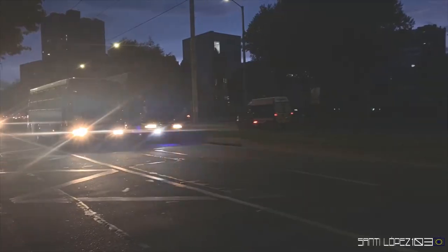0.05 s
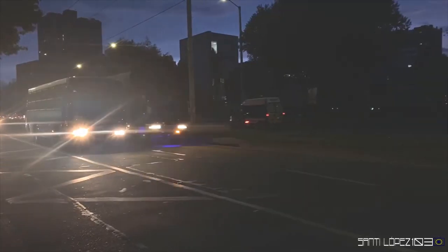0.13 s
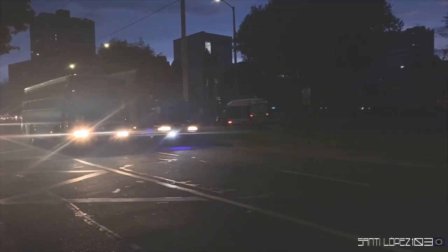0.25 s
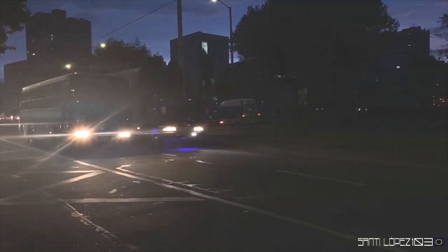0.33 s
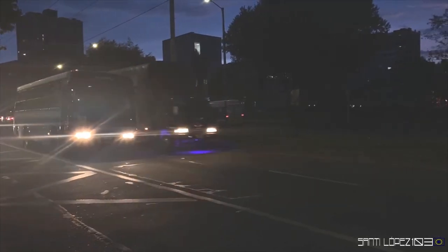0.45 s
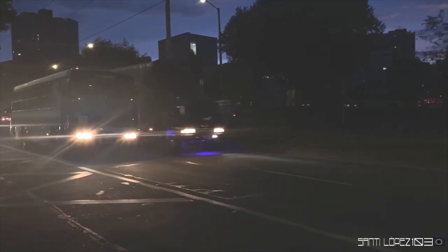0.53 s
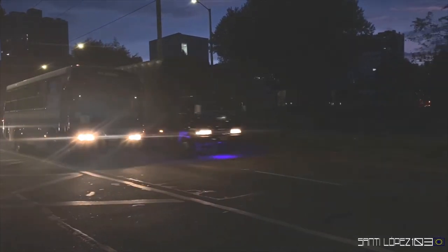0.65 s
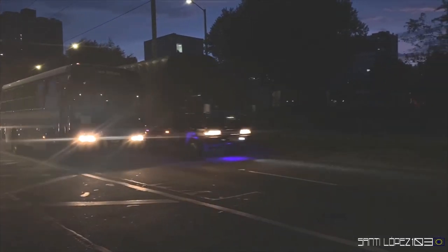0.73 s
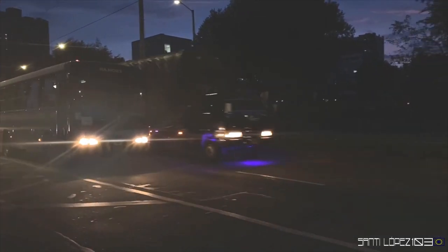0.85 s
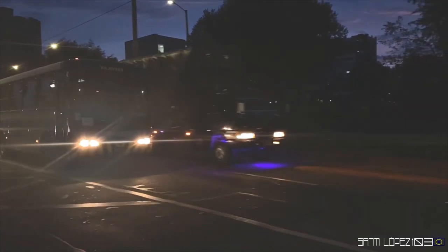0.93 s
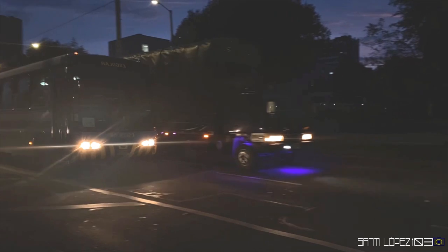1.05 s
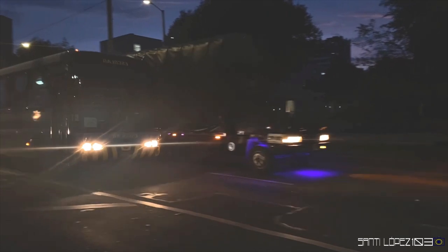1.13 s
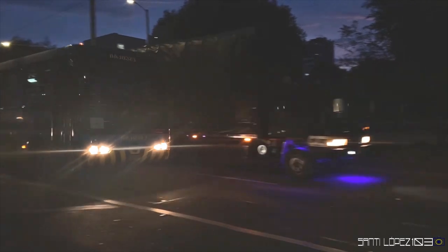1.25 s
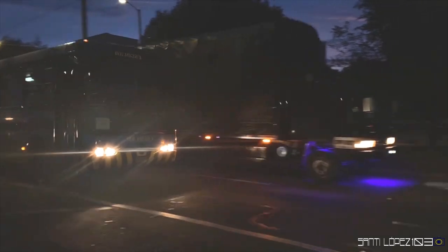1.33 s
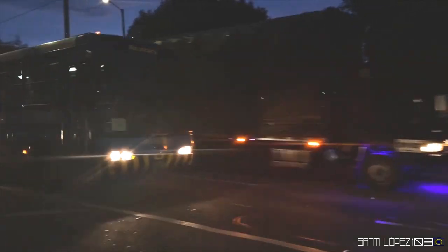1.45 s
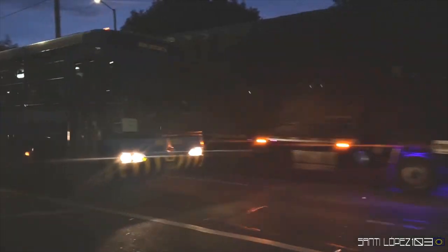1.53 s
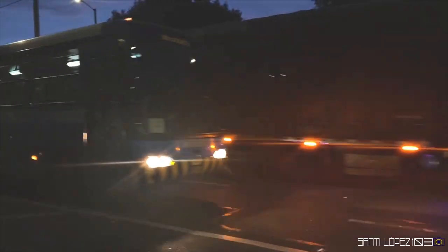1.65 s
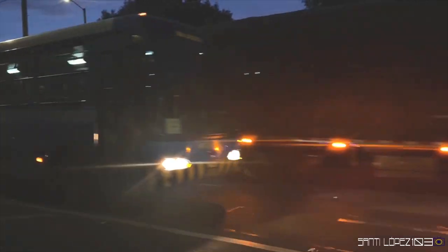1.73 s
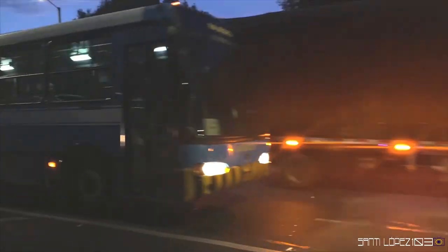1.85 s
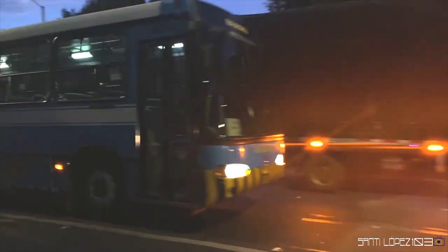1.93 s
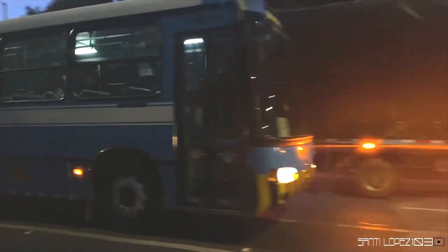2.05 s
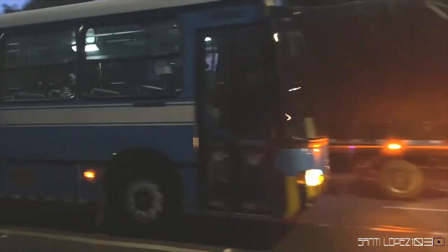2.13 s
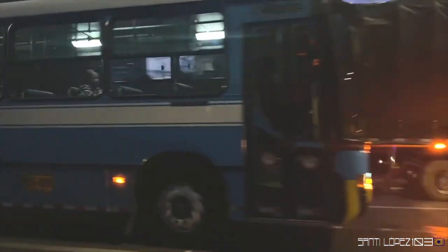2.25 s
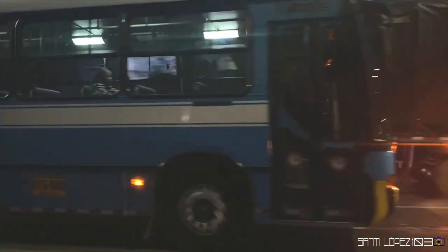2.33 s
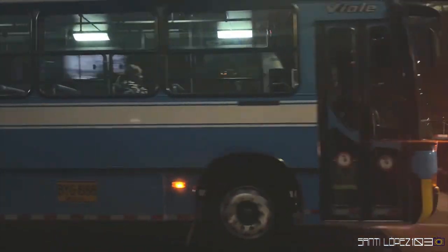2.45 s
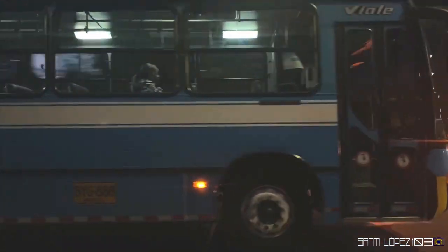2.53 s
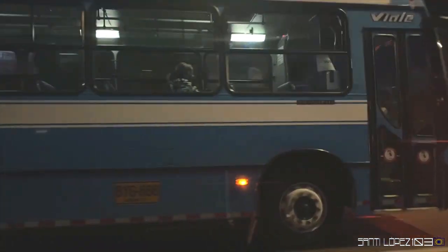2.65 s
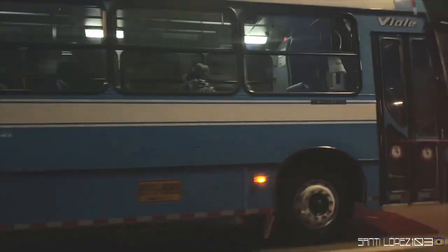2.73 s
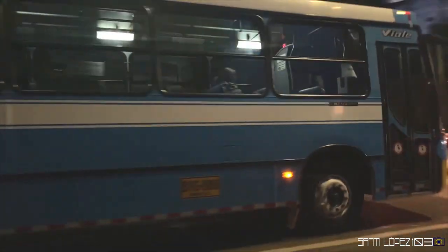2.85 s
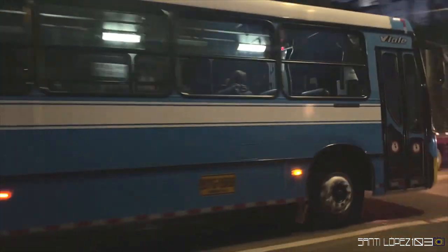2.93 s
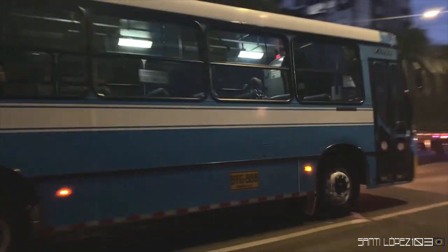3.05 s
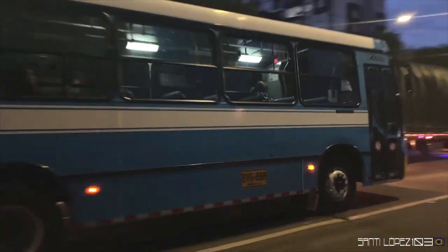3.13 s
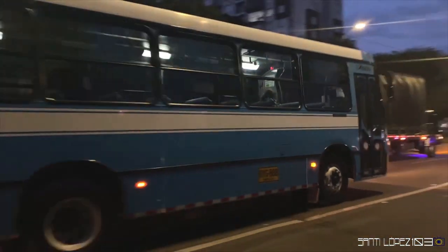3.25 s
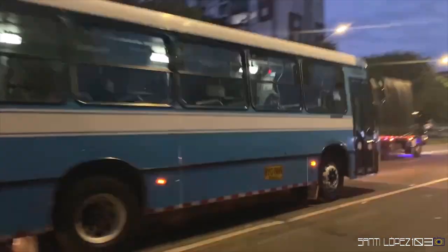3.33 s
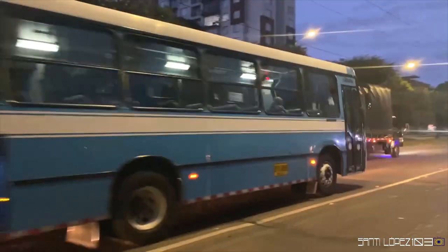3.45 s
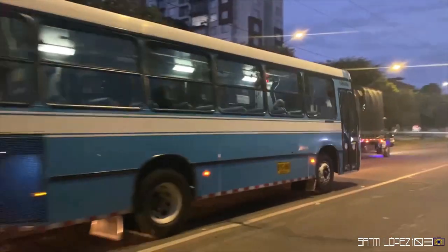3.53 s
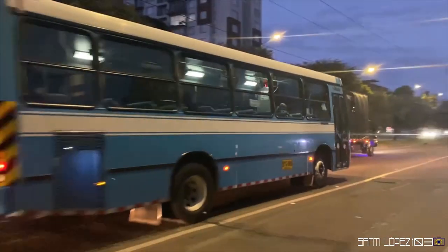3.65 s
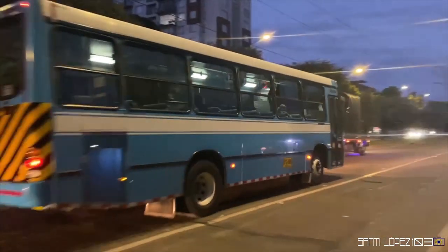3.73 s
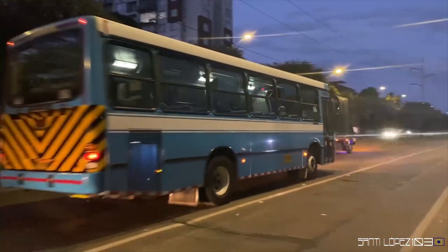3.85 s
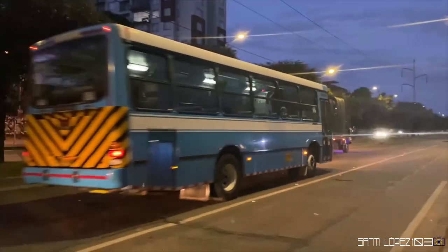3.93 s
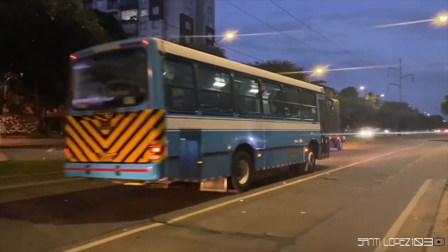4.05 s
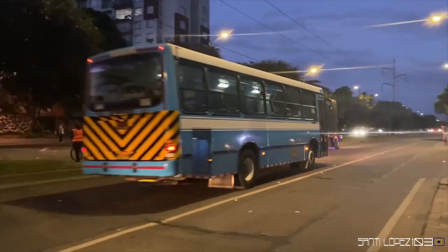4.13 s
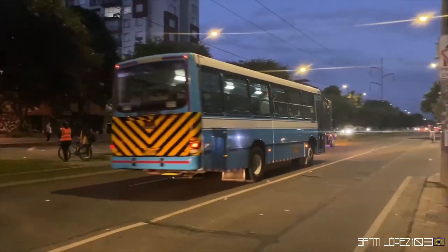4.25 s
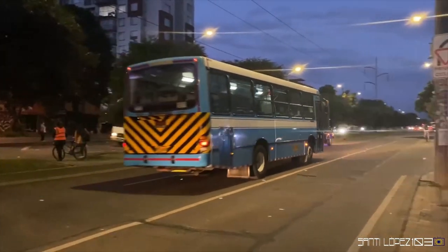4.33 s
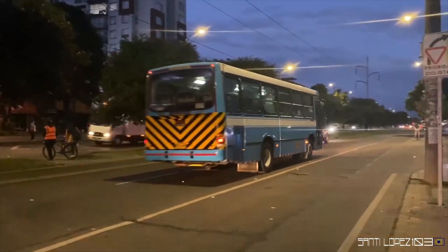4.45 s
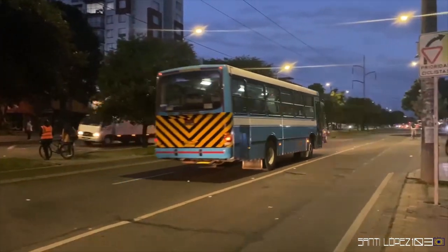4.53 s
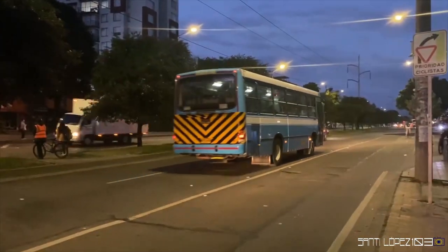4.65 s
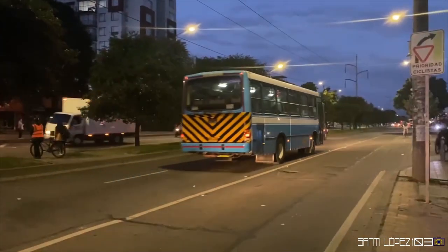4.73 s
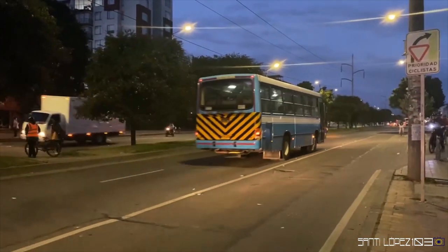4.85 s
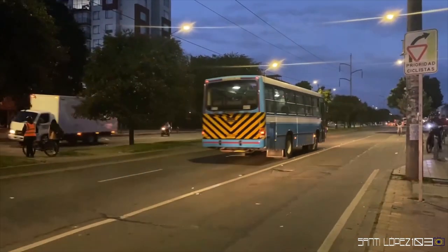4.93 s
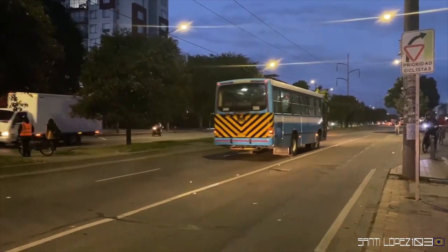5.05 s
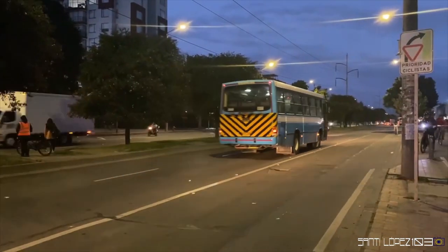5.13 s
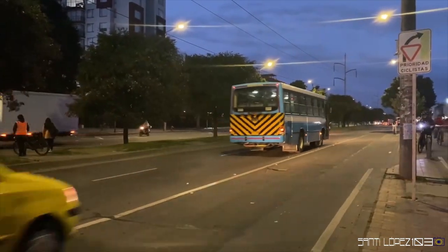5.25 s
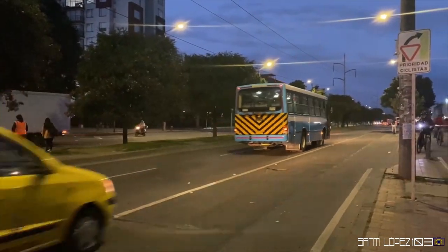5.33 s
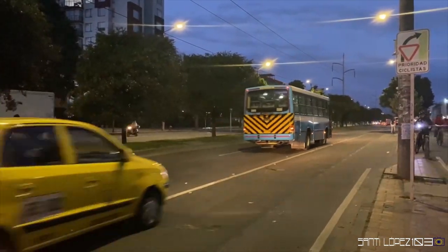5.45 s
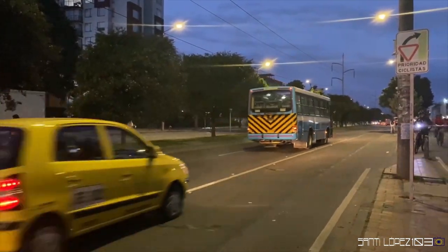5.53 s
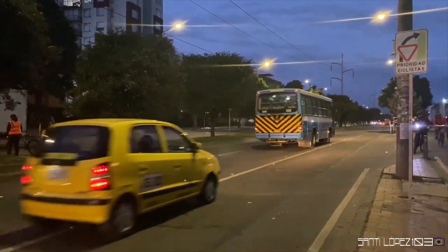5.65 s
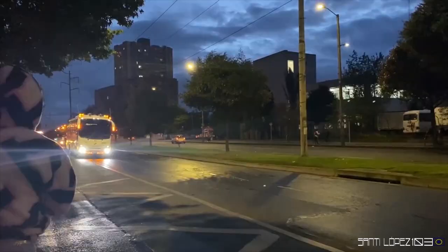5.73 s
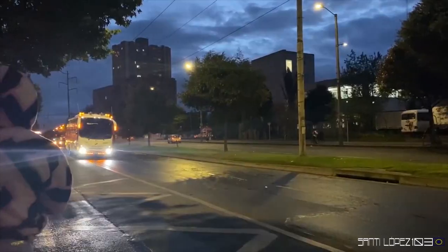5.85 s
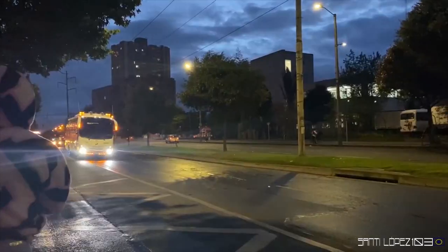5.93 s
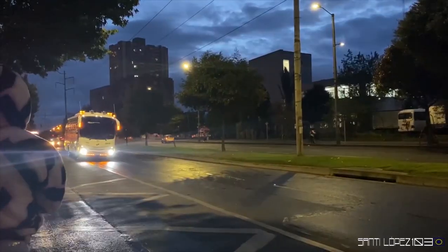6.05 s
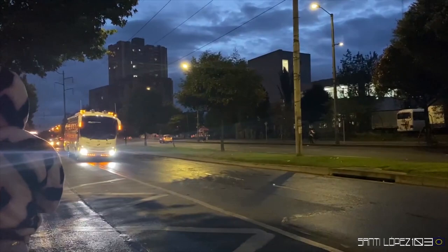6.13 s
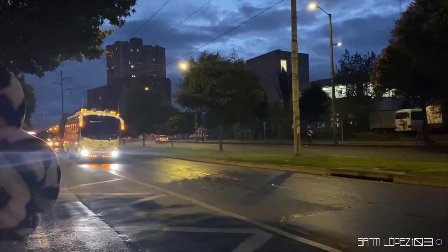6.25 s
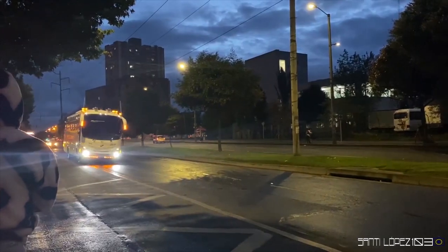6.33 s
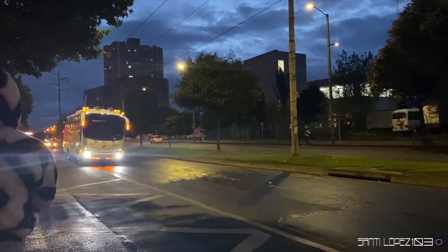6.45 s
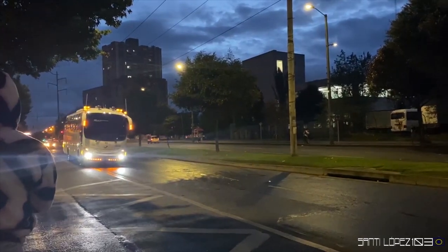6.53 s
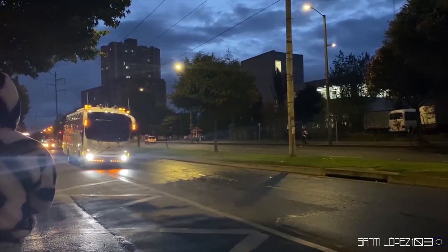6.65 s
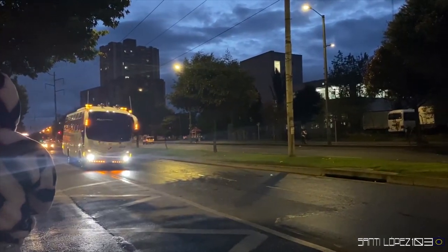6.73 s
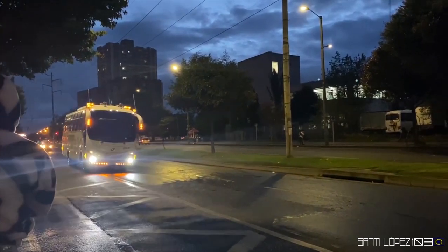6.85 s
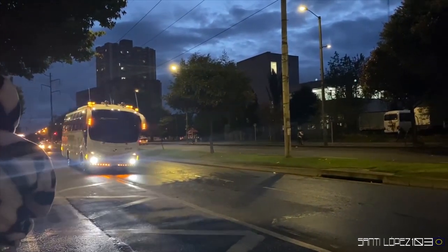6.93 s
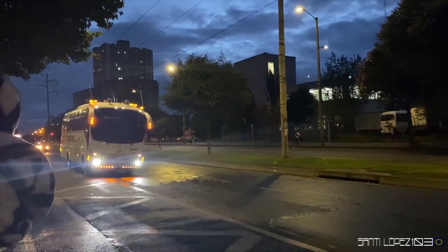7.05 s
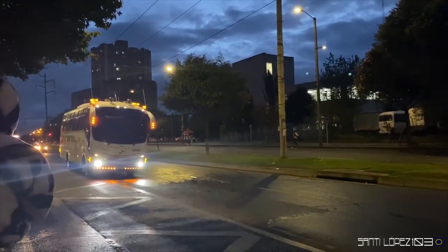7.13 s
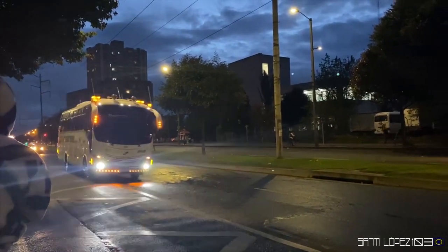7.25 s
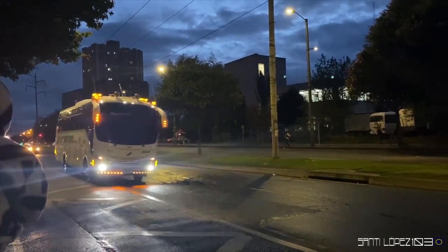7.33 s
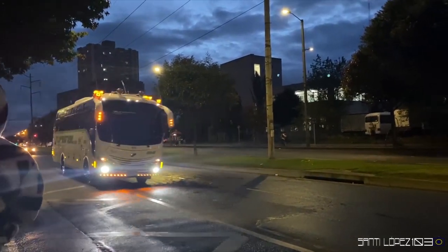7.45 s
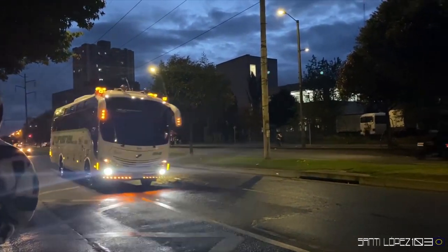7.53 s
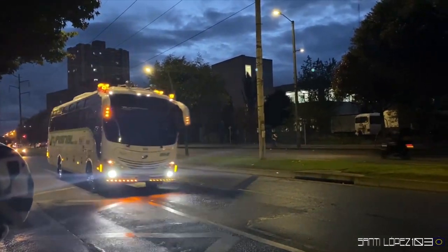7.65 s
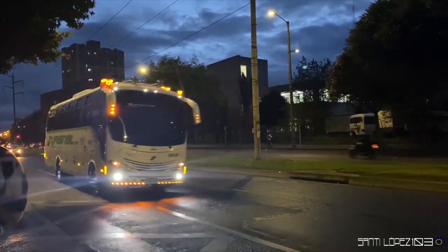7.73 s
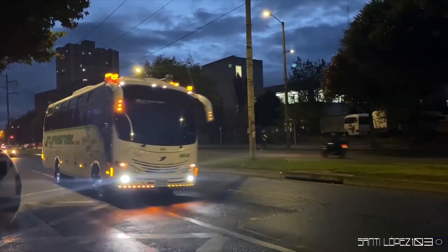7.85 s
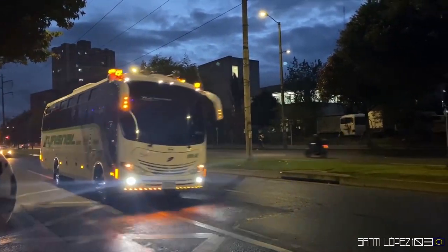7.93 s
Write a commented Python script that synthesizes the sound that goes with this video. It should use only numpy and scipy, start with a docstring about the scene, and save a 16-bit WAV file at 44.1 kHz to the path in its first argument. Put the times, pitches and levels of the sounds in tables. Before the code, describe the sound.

From the kerb of a wet city road, a diesel truck drones up and roars past with jingling loose metal and brief squeaks. A bus follows close with sharp air puffs, its engine swelling at the rear before pulling away, and a taxi rolls by. A dry click cuts to a quieter view where a coach approaches, engine pitch sinking over low booms and tyre hiss.

```python
"""Kerbside on a wet city road. A diesel truck drones by on harmonics of its firing rate, with loose metal
ringing in damped modes. A bus passes close with puffs of air, its engine drone swelling, and pulls away;
a taxi follows. Coloured noise makes their rumble, roar and wet-tyre spray.
Then a dry click and an abrupt jump to a quieter scene: a coach rolls up, a stack of firing multiples
falling in pitch as its engine slows, over low booms and tyre noise."""
import sys
import numpy as np
from scipy import signal
from scipy.fft import rfft, irfft, next_fast_len
from scipy.io import wavfile
from scipy.ndimage import map_coordinates

SR = 44100
rng = np.random.default_rng(int(sys.argv[2]) if len(sys.argv) > 2 else 0)


def persist_wave(psi):
    """Save psi, clipped to +-1, as 16-bit WAV."""
    counts = np.round(np.clip(psi, -1, 1) * 32767).astype(np.int16)
    wavfile.write(sys.argv[1], SR, np.atleast_2d(counts).T)


N = 352359

TIME = np.arange(N) / SR  # s
JUMP_S = 5.8017  # the second scene begins
SIDES = np.array([[1], [-1]])  # sign of the side signal, left and right
# spectrum of low road rumble: (frequency [Hz], relative level [dB])
RUMBLE_COLOUR = [(25, -33), (36, -13), (48, -5), (60, -5.5), (75, -6), (105, -6)]
# spectrum of fine water spray: (frequency [Hz], relative level [dB])
SPRAY_COLOUR = [(5500, 0), (7000, 0), (9200, -2.5), (11300, -6), (13200, -10.5), (15000, -11.5),
                (16500, -20)]
# edges of rumble, engine body, roar, clatter, spray and fine spray in the first scene: frequency [Hz]
PASSING_EDGES_HZ = [25, 105, 420, 1700, 5500, 9200, 16500]
# agreement of the two microphones, the usual bearing: (frequency [Hz], coherence [0-1], left lead [rad])
AHEAD = [(60, 0.86, 0), (150, 0.97, 0.0082), (400, 0.85, 0), (1050, 0.79, 0), (1730, 0.38, 0),
         (3650, 0.76, 0), (5730, 0.38, 0), (7560, 1, 0), (16000, 1, 0.038)]


def from_db(db):
    """Amplitude gain from decibels: 20 dB is a factor of ten."""
    return 10 ** (np.asarray(db) / 20)


def rms_one(x):
    """Normalisation to unit mean power."""
    return x / np.sqrt(np.mean(x ** 2) + 1e-20)


def in_time(rows):
    """Linear interpolation of each column of a curve at every sample."""
    s, *columns = np.transpose(rows)
    return [np.interp(TIME, s, c) for c in columns]


def at_hz(points, hz):
    """Interpolation of each column of a spectrum on a log-frequency axis."""
    known_hz, *columns = np.transpose(points)
    return [np.interp(np.log(hz), np.log(known_hz), c) for c in columns]


def drift(rate):
    """Random modulation of rms 1: white noise through a double-pole lowpass at this rate in Hz."""
    step = 40  # samples between computed values
    r = np.exp(-2 * np.pi * rate * step / SR)
    white = rng.standard_normal(N // step + 2002)
    slow = signal.lfilter([1], [1, -2 * r, r * r], white)[2000:]  # drops the filter's start
    return np.interp(np.arange(N) / step, np.arange(len(slow)), rms_one(slow))


def turning(hz):
    """Phase in radians as the time integral of frequency."""
    return 2 * np.pi * np.cumsum(hz) / SR


def swell(at_s, span_s, falloff=1.515):
    """Spreading loss along a straight pass: gain 1 when nearest, falling as a power of distance."""
    return (1 + ((TIME - at_s) / span_s) ** 2) ** (-falloff / 2)


def noise(colour, low, high, bearing=AHEAD):
    """Spectrally shaped stereo noise of rms 1; interaural-style coherence and phase set its bearing."""
    padded = next_fast_len(N, True)
    hz = np.fft.rfftfreq(padded, 1 / SR) + 1  # offset avoids log of zero
    edges = np.sqrt((1 + (low / hz) ** 24) * (1 + (hz / high) ** 24))
    gain = from_db(at_hz(colour, hz)[0]) / edges
    alike, lead = at_hz(bearing, hz)
    alike = np.clip(alike, 0, 1)
    mid, side = rfft(rng.standard_normal((2, padded)))
    pair = gain * (np.sqrt(1 + alike) * mid + SIDES * np.sqrt(1 - alike) * side)
    pair[0] *= np.exp(1j * lead)
    return rms_one(irfft(pair, padded)[:, :N])


def road_echo(x, size=1024, width_octaves=0.26):
    """Destructive interference: the road's reflection weakens one moving band of the noise."""
    # (time [s], centre [Hz], gain at the centre [dB])
    hollow = [(1.4, 1600, 0), (1.9, 1640, -4), (3.1, 1680, 0), (3.6, 2000, -3), (4.0, 2350, -1.5),
              (4.6, 2450, -4), (6.5, 2500, -0.5), (7.3, 2440, -7.5), (7.95, 2370, -4)]
    hz, s, frames = signal.stft(x, SR, nperseg=size)
    known_s, *columns = np.transpose(hollow)
    centre_hz, depth_db = (np.interp(s, known_s, c) for c in columns)
    octaves = np.log2((hz[:, None] + 1) / centre_hz)
    notch = from_db(depth_db * np.exp(-(octaves / width_octaves) ** 2))
    return signal.istft(frames * notch, SR, nperseg=size)[1][:, :N]


def truck_nearness():
    """Spreading loss of the truck's engine: a passing swell in power sum with what carries from afar."""
    return np.hypot(from_db(5) * swell(1.18, 0.78), from_db(-15))


def passing_noise(phase, knock=0.16, roar_knock=0.18, flutter_db=0.78, spray_flutter_db=1.1):
    """Broadband rolling and engine noise by superposition: each vehicle has its own spectrum and bearing."""
    # truck, bus's flank, bus's rear engine, taxi behind it: (nearest [s], span [s], rumble [dB],
    # engine body [dB], roar [dB], clatter [dB], spray [dB], fine spray [dB])
    passes = [(1.2, 0.92, -31, -24, -18.5, -25, -36.5, -51),
              (2.1, 0.62, -28, -22.5, -30.5, -31.5, -38.5, -42),
              (3.57, 0.66, -28.5, -28, -18.5, -27.5, -41.5, -44.5),
              (5.28, 1.0, -34.5, -27, -26.5, -33, -44.5, -50)]
    # lows carry further than highs: (stretch of the span) for each of the six bands
    carry = [1.9, 1.42, 0.95, 0.85, 0.76, 0.84]
    # noise spectra of the same four: (frequency [Hz], relative level [dB])
    truck_colour = [(120, -1), (310, -3), (450, -5.5), (690, -0.5), (850, -3.5), (1100, 0), (1900, -12.5),
                    (2900, -23.5), (3700, -26), (5600, -29.5)]
    flank_colour = [(120, -1.5), (200, -1.5), (320, 3), (450, -3.5), (800, -20), (1130, -14), (1700, -26),
                    (3400, -13), (5600, -19)]
    rear_colour = [(120, -1.5), (165, -3), (330, -10.5), (580, -3), (850, -9), (1500, -7), (1950, -14),
                   (3000, -25), (5600, -27.5)]
    taxi_colour = [(120, -4), (205, 0.5), (330, -6.5), (560, -5.5), (800, -6), (1400, -6.5), (1750, -18),
                   (2700, -19.5), (3600, -28.5), (5600, -34.5)]
    # bearing of the bus's rear engine: (frequency [Hz], coherence [0-1], left lead [rad])
    beside = [(100, 1, -2), (300, 0.99, 1.75), (580, 0.49, -0.34), (1010, 0.19, 2), (1340, 1, 2),
              (1680, 0.73, 3), (2520, 0.19, 5.5), (3580, 0.71, 6.5), (5500, .4, 5.5)]
    voices = [(truck_colour, AHEAD), (flank_colour, AHEAD), (rear_colour, beside), (taxi_colour, AHEAD)]
    layers = np.zeros((len(carry), 2, N))
    for (s, span, *levels), voice in zip(passes, voices):
        rumble_part, spray_part = (RUMBLE_COLOUR, AHEAD), (SPRAY_COLOUR, AHEAD)
        parts = [rumble_part, voice, voice, voice, spray_part, spray_part]
        for k, (db, (colour, bearing)) in enumerate(zip(levels, parts)):
            band = noise(colour, PASSING_EDGES_HZ[k], PASSING_EDGES_HZ[k + 1], bearing)
            layers[k] += from_db(db) * swell(s, span * carry[k]) * band
    rumble, body, roar, clatter, spray, fine_spray = layers
    # combustion knock: the noise swells at each firing while the truck is near
    firing = truck_nearness() * (np.cos(phase) + 0.91 * np.cos(phase / 2)) / 2
    roar = roar * (1 + roar_knock * firing) * from_db(flutter_db * drift(16.5))
    clatter = clatter * (1 + knock * firing) * from_db(flutter_db * drift(4.9))
    all_spray = (spray + fine_spray) * from_db(spray_flutter_db * drift(23))
    return rumble + body + roar + clatter + all_spray


def arriving_noise(flutter_db=0.9):
    """Broadband rolling noise: the coach's bands change steadily in dB and its wet tyres hiss in passing."""
    # rumble, engine body, roar, tyres: (level at the jump [dB], change [dB/s])
    approach = [(-28, -2), (-33, 2), (-33.5, 1.5), (-36.5, 3)]
    # (frequency [Hz], relative level [dB])
    coach_colour = [(120, 7.5), (220, 1.5), (330, -3.5), (550, -6), (720, -12), (1100, -13.5),
                    (1850, -17.5), (2450, -21.5), (3400, -22), (4300, -25), (5600, -24.5)]
    # edges of the six bands: frequency [Hz]
    band_edges = [25, 105, 250, 900, 2600, 5500, 16500]
    # the coach's bearing: (frequency [Hz], coherence [0-1], left lead [rad])
    far = [(55, 0.93, 0.5), (108, 1, 0.1), (292, 0.91, -1.36), (537, 0.45, -2), (760, 0.12, 1),
           (1010, 0.39, 0), (1280, 0.64, 3.5), (1880, 0.25, 2.5), (2660, 0.33, -2), (3600, 1, 1),
           (5640, .4, 0.5), (7300, 1, 0)]
    colours = [RUMBLE_COLOUR, coach_colour, coach_colour, coach_colour, coach_colour, SPRAY_COLOUR]
    gains = [from_db(db + rise_db * (TIME - JUMP_S)) for db, rise_db in approach]
    gains += [from_db(db) * swell(7.3, 0.85) for db in (-40, -42)]  # wet hiss, then spray
    out = 0
    for gain, colour, low, high in zip(gains, colours, band_edges, band_edges[1:]):
        out = out + gain * from_db(flutter_db * drift(6.7)) * noise(colour, low, high, far)
    return out


def rushes(rows, spread=0.066):
    """Heterodyned noise: lowpassed noise shifted up to a centre that glides as its vehicle goes by."""
    out = 0
    for s, span, centre_hz, glide, half_width_hz, db in rows:
        lowpass = signal.butter(2, half_width_hz, fs=SR, output="sos")
        slow = signal.sosfilt(lowpass, rng.standard_normal((2, 2, N)))
        phase = turning(centre_hz + glide * np.tanh(TIME - s))
        mid, side = slow[0] * np.cos(phase) + slow[1] * np.sin(phase)
        out = out + from_db(db) * swell(s, span) * rms_one(mid + spread * side * SIDES)
    return out


def splashes():
    """Turbulent spray: tyres in wetter patches throw a fine, high noise band."""
    # (nearest [s], span [s], level [dB])
    wet_patches = [(1.65, 0.42, -41.5), (2.655, 0.016, -35)]
    # (frequency [Hz], relative level [dB])
    hiss_colour = [(9000, -9.5), (11400, 4), (16000, -13)]
    gain = sum(from_db(db) * swell(s, span) for s, span, db in wet_patches)
    return gain * noise(hiss_colour, PASSING_EDGES_HZ[4], PASSING_EDGES_HZ[-1])


def jump_click(db=-13, decay_s=0.001):
    """A step with exponential decay: the abrupt change of scene makes one dry click."""
    return from_db(db) * np.exp(-np.clip(TIME - JUMP_S, 0, .05) / decay_s)


def puffs(attack_s=0.003, decay_s=0.02):
    """Jet noise: an air valve opens for an instant, sputters, and its turbulent hiss decays exponentially."""
    # (opening [s], length [s], level before dulling [dB], lowpass cutoff [Hz])
    openings = [(1.241, 0.009, -24, 9000), (2.247, 0.009, -15.2, 9500), (2.309, 0.008, -14.8, 15000),
                (2.329, 0.011, -15.8, 12000), (2.428, 0.008, -25.5, 12000), (2.777, 0.008, -25, 7500)]
    # (frequency [Hz], relative level [dB])
    jet_colour = [(550, 7), (1100, 13), (1800, 5.5), (2500, -2.5), (4200, 3), (7000, -4), (12500, -10.5),
                  (16000, -14)]
    out = 0
    for s, length, db, top_hz in openings:
        attack = np.clip((TIME - s) / attack_s, 0, 1)
        decay = np.exp(-np.clip(TIME - s - length, 0, .5) / decay_s)
        dull = signal.butter(2, min(top_hz, .45 * SR), fs=SR, output="sos")
        out = out + from_db(db) * attack * decay * signal.sosfilt(dull, noise(jet_colour, 430, 16000))
    return out * from_db(1.5 * drift(200))  # sputter


def squeaks(chafe=.35, chafe_bend=.012):
    """Frictional tones: metal rubs on metal for an instant, unsteady by these shares of level and pitch."""
    # (centre [s], span [s], frequency [Hz], level [dB])
    rubs = [(.592, 0.013, 3300, -32.5), (.75, 0.043, 4900, -38), (1.81, .014, 4760, -32),
            (1.881, .011, 4770, -25.5), (2.106, .011, 3020, -30.5), (2.231, .009, 8100, -33)]
    out, bend = np.zeros(N), 1 + chafe_bend * drift(120)
    for s, span, hz, db in rubs:
        near = np.abs(TIME - s) < 4 * span
        envelope = from_db(db) * np.exp(-((TIME[near] - s) / span) ** 2)
        out[near] += envelope * np.sin(turning(hz * bend[near]))
    return np.sqrt(2) * out * (1 + chafe * drift(200))


def jingles(bounce_s=0.011, scatter_db=-2.0, chink_db=-20.0, chink_s=0.0094, count=9):
    """Modal resonance: each jolt bounces loose metal; every touch chinks and excites its modes afresh."""
    # jolts of the truck: (time [s], strength [dB])
    jolts = [(0.0608, -26.5), (0.1989, -30), (0.238, -29), (0.508, -27.5), (0.694, -27.5), (0.7555, -26),
             (0.796, -28.5), (1.85, -24), (1.8732, -15), (1.905, -22), (1.984, -15), (2.1044, -27)]
    # modes of the metal: (frequency [Hz], relative level [dB], 60 dB decay time [s])
    metal = [(4760, -18, 0.088), (6980, -16, 0.11), (7430, -19.5, 0.12), (8170, -16, 0.081),
             (8650, -16, 0.05), (11370, -18, 0.069), (12530, -17, 0.048), (14950, -22, 0.03)]
    # pitch as it nears and passes: (time [s], Doppler factor)
    doppler = [(0, 1.034), (.8, 1.031), (1.4, 1.018), (1.85, 1.0), (2.7, .992)]
    buzz_depth, grip_bend = .55, .004  # buzz against the mount: share of level, share of pitch
    s, db = np.transpose(jolts)
    delays = rng.exponential(bounce_s, (len(s), count)) * (np.arange(count) > 0)  # the first is at once
    at = ((s[:, None] + delays) * SR).astype(int)
    strength = from_db(db[:, None]) * np.exp(-delays / (4 * bounce_s))
    # the metal's own clock runs fast while it approaches, and wavers as the parts grip and let go
    clock = np.cumsum(in_time(doppler)[0] * (1 + grip_bend * drift(40)))
    rings = np.zeros(int(clock[-1]) + 2)
    for hz, mode_db, t60 in metal:
        r, w = from_db(-60 / (t60 * SR)), 2 * np.pi * hz / SR  # pole radius and angle
        clicks = np.full(len(rings), 1e-18)
        mode_gain = from_db(mode_db + scatter_db * rng.standard_normal(at.shape))
        clicks[clock[at].astype(int)] = strength * mode_gain
        rings += signal.lfilter([0, np.sin(w)], [1, -2 * r * np.cos(w), r * r], clicks)
    touches = np.full(N, 1e-18)
    touches[at] = strength ** 2
    chink_power = signal.lfilter([1], [1, -np.exp(-2 / (chink_s * SR))], touches)
    chink = np.sqrt(chink_power) * noise([(6000, 0), (16000, 0)], 4100, 16000)
    buzz = 1 + buzz_depth * drift(220)
    return buzz * map_coordinates(rings, [clock], order=3) + from_db(chink_db) * chink


def drone(rows, rough=.22):
    """Periodic engine tone: swells add in power and the pitch is their power-weighted mean."""
    powers = np.array([(from_db(db) * swell(s, span)) ** 2 for s, span, _, db in rows])
    total = powers.sum(axis=0)
    hz = np.array(rows)[:, 2] @ powers / total
    # rough is a share of the level and also a phase waver in radians
    return np.sqrt(2 * total) * (1 + rough * drift(8.7)) * np.sin(turning(hz) + rough * drift(4.8))


def coach_engine(sway_db=1.0, fade_db_per_order=0.5, wobble=0.0019):
    """Harmonic series of the firing rate, strongest around the pipe resonance; higher orders flicker more."""
    # (time [s], firing rate [Hz], level of the fourth multiple [dB])
    slowing = [(5.85, 74.94, -41), (6.15, 73.8, -36), (6.6, 72.6, -32.5), (6.95, 70.84, -32),
               (7.3, 69.38, -28), (7.55, 68.2, -39), (7.99, 65.4, -36.5)]
    # (multiple of the firing rate, relative level [dB])
    orders = [(1, -7), (4, 0), (5, -7), (6, -15.5), (7, -18), (8, -13), (9, -23)]
    # single multiples surge: (centre [s], span [s], multiple, rise [dB])
    surges = [(6.57, .12, 6, 9), (6.6, .35, 5, 3.5), (7.08, .1, 8, 4), (7.13, .14, 6, 9), (7.95, .15, 5, 9)]
    hz, db = in_time(slowing)
    phase = turning(hz * (1 + wobble * drift(5.1)))
    stack = 0
    for k, order_db in orders:
        surge_db = sum(rise * np.exp(-((TIME - s) / span) ** 2)
                       for s, span, multiple, rise in surges if round(multiple) == round(k))
        flicker_db = (sway_db + fade_db_per_order * max(k - 3, 0)) * drift(6)
        tone = np.sin(k * phase + rng.uniform(0, 2 * np.pi))
        stack = stack + from_db(order_db + surge_db + flicker_db) * tone
    return np.sqrt(2) * from_db(db) * stack


def diesel_clack(phase, sharpness=0.6, uneven_db=1.5):
    """Amplitude modulation by combustion: a bright noise band peaks at each firing as the truck is abreast."""
    # (nearest [s], span [s], centre [Hz], greatest glide either way [Hz], half-width [Hz], level [dB])
    clack = (1.4, 0.26, 3650, 220.5, 600, -30.5)
    ticks = rms_one(np.exp(sharpness * np.cos(phase)) * from_db(uneven_db * drift(40)))
    return ticks * rushes([clack])


def truck_engine(phase, throb=0.051, waver=0.34):
    """Harmonics of the engine cycle: exhaust booms at the firing rate, unequal cylinders add a growl."""
    # the exhaust tone briefly fades or blooms: (centre [s], span [s], change [dB])
    wavers = [(.63, 0.11, -5), (1.36, 0.16, -3.5), (3.19, 0.042, -18), (3.35, 0.056, 2.5),
              (3.57, 0.13, -4.5), (4.41, 0.13, -27), (4.75, 0.059, 4.5), (4.89, 0.041, -11),
              (5.35, 0.092, -8), (5.5, 0.043, 3.5), (5.63, 0.045, -8)]
    # uneven cylinders: (multiple of the six-firing cycle, level [dB])
    orders = [(4, -30), (5, -32), (9, -31.5), (12, -35), (16, -34), (21, -33.5)]
    waver_db = sum(db * np.exp(-((TIME - s) / span) ** 2) for s, span, db in wavers)
    # the exhaust is loudest just after the engine has gone by
    boom_gain = from_db(-9.5 + waver_db) * swell(1.61, 1.16)
    boom = boom_gain * (1 + throb * drift(28)) * np.sin(phase)
    cycle = phase / 6
    growl = 0
    for k, db in orders:
        level = from_db(db) * (1 + waver * drift(3.9))
        growl = growl + level * np.sin(k * cycle + waver * drift(3.1) + rng.uniform(0, 2 * np.pi))
    return np.sqrt(2) * (boom + swell(1.4, 1.66) * growl)


def scene(grain_db=0.7):
    """Superposition of sources: truck, bus and taxi first, then an abrupt change to the coach."""
    # truck engine speed: (time [s], firing rate [Hz])
    truck_speed = [(0, 92.45), (.6, 94.4), (1.2, 94.87), (1.85, 95.97), (2.55, 94.6), (3.4, 96.2),
                   (4, 96.5), (5, 101.7), (5.8, 99.6)]
    # bus engine, then low booms under the coach: (nearest [s], span [s], frequency [Hz], level [dB])
    bus_drones = [(2.64, 0.16, 244.5, -27), (3.01, 0.15, 248.1, -24), (3.59, 0.08, 244, -24.5),
                  (3.89, 0.15, 250, -23)]
    coach_booms = [(6, 0.22, 59.43, -28), (7.1, 0.0694, 70, -26.5), (7.6, .3, 56.2, -24.5)]
    # hiss and roar of truck, bus and taxi, then of the coach: (nearest [s], span [s], centre [Hz],
    # greatest glide either way [Hz], half-width [Hz], level [dB])
    passing_rushes = [(0.32, 0.28, 740, 1, 93, -29), (1.2, 0.38, 2600, 99.5, 190, -33.5),
                      (2.7, 0.12, 2450, 200, 250, -36.5), (3.08, 0.33, 2330, 200, 360.1, -29.5),
                      (3.45, 0.23, 2660, 700.5, 260, -33), (3.65, 0.53, 155, 40, 29, -24),
                      (4.45, 0.41, 202, 15, 21.39, -31), (3.65, 0.23, 1480, 500, 150, -31.5),
                      (4.25, 0.32, 1950, 300, 200, -36.5), (3.65, 0.3, 6580, 100.5, 210, -44),
                      (5.05, 0.54, 4645, 100, 400, -46.5), (5.3, 0.45, 2846, 100, 250, -51)]
    coach_rushes = [(7.05, 0.28, 113, -7, 7.9, -31), (5.5, 0.36, 1800, -100, 670, -40),
                    (6.85, 0.28, 1700, -50, 160, -43), (7.3, 0.34, 3750, 900, 570, -45.5),
                    (8.0, 0.25, 1200, 100, 372, -32), (7.95, 0.37, 220, 0, 47, -30.5)]
    phase = turning(in_time(truck_speed)[0])
    road = road_echo(passing_noise(phase)) + rushes(passing_rushes) * from_db(grain_db * drift(29))
    truck = truck_engine(phase) + diesel_clack(phase) + jingles() + squeaks()
    first = truck + drone(bus_drones) + puffs() + splashes() + road
    coach_road = road_echo(arriving_noise()) + rushes(coach_rushes)
    second = coach_engine() + drone(coach_booms) + coach_road
    return np.where(TIME < JUMP_S, first, second + jump_click())


def record(dry):
    """Linear filtering at two unlike microphone ports, then clipping of peaks and a steep lowpass."""
    # (frequency [Hz], left minus right [dB], left lead [rad])
    ports = [(100, -.7, 0), (400, 0, 0), (1500, -2, 0), (2200, -1, .1), (3100, 2.5, .8), (4500, 3.2, .2),
             (7000, .6, 0), (7500, .4, -.5), (9100, 0, -3.1), (10300, 0, -5.9), (11700, 0, -6.3),
             (13400, 0, -9.4), (14800, 0, -12.5)]
    padded = next_fast_len(N + SR // 10, True)
    lean_db, lead = at_hz(ports, np.fft.rfftfreq(padded, 1 / SR) + 1)
    response = from_db(SIDES * lean_db / 2) * np.exp(1j * lead * [[1], [0]])
    heard = irfft(rfft(dry, padded) * response, padded)[:, :N]
    held = np.clip(heard, -.95, .95)
    lowpass = signal.ellip(10, .1, 80, 15900, fs=SR, output="sos")  # ripple and rejection dB, cutoff Hz
    return signal.sosfilt(lowpass, held)


dry = scene()
out = record(dry)
persist_wave(out)
```